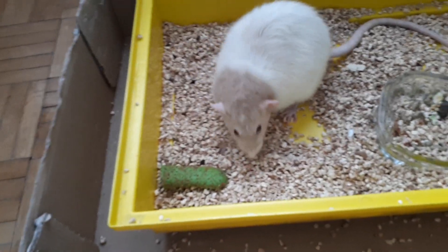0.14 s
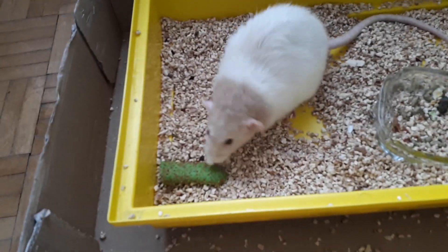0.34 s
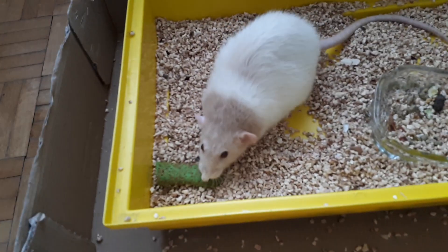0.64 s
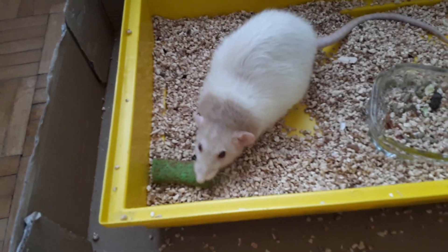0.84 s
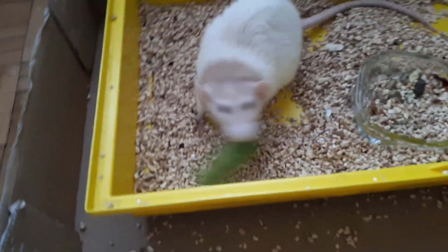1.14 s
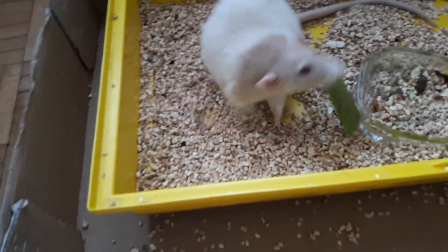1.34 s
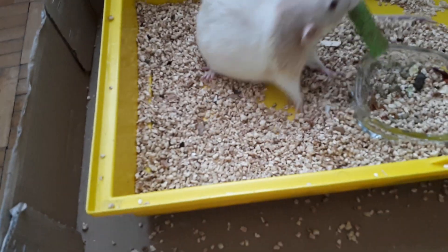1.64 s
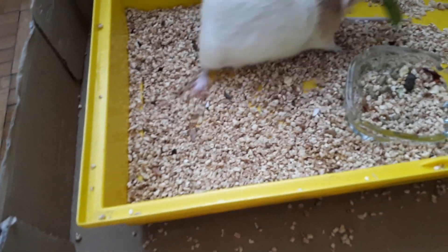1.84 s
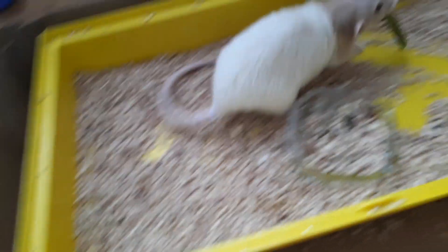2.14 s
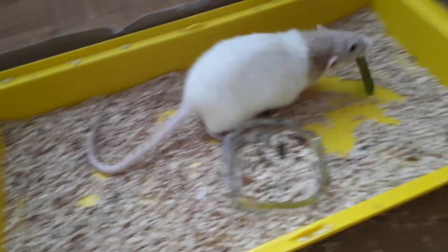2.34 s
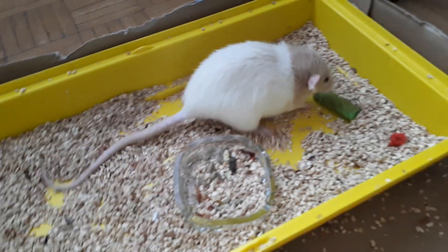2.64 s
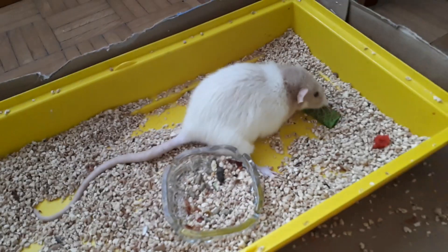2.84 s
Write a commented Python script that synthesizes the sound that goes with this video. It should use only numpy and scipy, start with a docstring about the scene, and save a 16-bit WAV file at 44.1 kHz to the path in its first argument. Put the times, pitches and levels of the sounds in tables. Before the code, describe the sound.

A pet rat rustles and crunches through dry granular bedding, faint ticks first, then louder scuffles

```python
"""First small dry ticks over a faint rustle; then louder shuffles, crunches, bumps, a knock and a clink.
A pet rat noses through loose granular bedding in a plastic tray: random grain clicks, filtered, under envelopes.
Teeth or claws tick as short decaying cosines; footfalls bump the tray floor and ring its damped modes.
A stick treat knocks on the tray wall and clinks on a glass bowl, both as struck modes.
The tray stands in a cardboard box in a quiet room: decaying noise echoes and faint shaped noise."""
import sys
import numpy as np
from scipy import signal
from scipy.fft import rfft, irfft
from scipy.io import wavfile

SR = 44100
rng = np.random.default_rng(int(sys.argv[2]) if len(sys.argv) > 2 else 0)


def int16_out(signal):
    """Quantize to a 16-bit WAV file."""
    q = np.round(np.clip(np.atleast_2d(signal).T, -1, 1) * 32767)
    wavfile.write(sys.argv[1], SR, q.astype(np.int16))


N = 132300  # 3 s
HZ = np.fft.rfftfreq(4096, 1 / SR)  # filter frequencies
T = np.arange(SR // 4) / SR  # time axis of one event [s]

# Shuffles through the bedding: (start [s], length [s], level [dB], treble [dB])
SHUFFLE_EVENTS = [(0, 0.11, -49, -3), (0.139, 0.038, -44.5, -4.5), (0.258, 0.083, -35.5, -6.5),
                  (0.343, 0.1, -55, 6), (0.47, 0.095, -52, -2), (.577, 0.06, -49, -6),
                  (0.702, 0.034, -41, -14), (0.776, 0.037, -46.5, -11), (0.858, 0.038, -44.5, -10),
                  (1.01, 0.12, -52, -2), (1.118, 0.049, -37.5, -6.5), (1.152, 0.067, -35.5, -2.5),
                  (1.259, 0.094, -41, -6), (1.338, 0.039, -29.5, -2), (1.384, 0.12, -35.5, -3),
                  (1.53, 0.047, -31.5, 0), (1.613, 0.13, -32.5, -1), (1.744, 0.18, -32, -1),
                  (1.939, 0.11, -32.5, 1.5), (2.051, 0.072, -34.5, -1.5), (2.134, 0.036, -25, 1.5),
                  (2.186, 0.09, -40, -6), (2.257, 0.053, -33, -1), (2.318, 0.16, -40, -3),
                  (2.47, 0.087, -32.5, 0), (2.564, 0.052, -26, -1), (2.617, .12, -31.5, -2),
                  (2.746, 0.135, -30, 1), (2.89, 0.038, -37.5, -8), (2.967, 0.025, -39, -3)]
SHUFFLE_RISE_S, SHUFFLE_LEAD_S, SHUFFLE_FALL_S = 0.022, 0.012, 0.013
LUMP_RANGE_DB, LUMP_STEP_S = 3, 0.00697  # uneven push
GRAINS_PER_S, GRAIN_SPREAD_DB = 6000, 2.5
# Larger single pellets snap past each other; decay time counted in cycles
PELLETS_PER_S, PELLET_DB, PELLET_DECAY_CYCLES = 330, -8.5, 3.5
PELLET_LOW_HZ, PELLET_HIGH_HZ, PELLET_SIZES = 1413, 12270, 10

# Grains give way under a paw: (time [s], level [dB], decay [s], treble [dB])
CRUNCH_EVENTS = [(0.255, -30.5, 0.0019, -6), (0.268, -28, 0.0012, -9), (.328, -28, 0.0017, -8),
                 (.720, -33, 0.0036, -6), (.784, -34, 0.0019, -9), (.862, -37.5, 0.0027, -10),
                 (.882, -33.5, 0.0018, -9), (1.167, -19.5, 0.0065, -4), (1.424, -18.5, 0.0062, 0.5),
                 (1.433, -19, 0.004, 2.5), (1.536, -23, 0.0089, -5), (1.731, -19, 0.0092, -7.5),
                 (1.754, -20.5, 0.0039, -12), (1.7824, -18.5, 0.0058, -4.5), (1.872, -14, 0.0024, -26),
                 (1.933, -22, 0.0046, 4.5), (1.954, -21, 0.0076, 2.5), (1.9944, -19, 0.0021, 6.5),
                 (2.142, -20.5, 0.0045, 10), (2.176, -19, 0.0034, 7.5), (2.3863, -18.5, 0.004, 7),
                 (2.406, -28, .004, -1), (2.576, -21.5, 0.0067, 0), (2.7136, -12, 0.0045, -6.5),
                 (2.8654, -10.5, 0.0035, 3.5), (2.968, -25.5, 0.0039, -1)]
CRUNCH_RISE_S, CRUNCH_LEAD_S = 0.0019, 0.001
CRUNCH_GRAINS_PER_S, CRUNCH_SPREAD_DB = 14000, 2.5

# Grain spectrum: (frequency [Hz], gain [dB])
GRAIN_SPECTRUM = [(100, -34), (270, -24.5), (370, -12.5), (550, -16.5), (780, 1), (1100, -2), (16000, -2)]
TREBLE_FROM_HZ, TREBLE_FULL_HZ = 4700, 11100

# Ticks of teeth or claws: (time [s], level [dB], pitch [Hz], decay [s], lower resonance [dB])
TICK_EVENTS = [(.0068, -24.5, 3380, 0.00031, -8), (0.0445, -21, 3260, 0.00033, -22),
               (.210, -32.5, 3640, 0.00077, -24), (0.2201, -32, 3680, 0.0007, -24),
               (0.3757, -25, 3740, .00073, -22), (.3879, -22.5, 3680, .00044, -9),
               (0.4386, -18, 4450, .00015, -12)]
TICK_SNAP_GAIN, TICK_LOW_HZ, TICK_LOW_DECAY_S, CRUMBS_DB = 0.92, 2650, 0.00044, -14

# Bumps on the tray floor, some with less bass:
# (time [s], level [dB], low edge [Hz], high edge [Hz], decay [s])
BUMP_EVENTS = [(1.244, -28.5, 600, 1800, 0.022), (1.257, -26, 565, 1020, 0.016),
               (1.424, -36.5, 300, 1370, 0.022), (1.483, -35.5, 310, 567, 0.013),
               (1.733, -40, 250, 1380, 0.057), (1.783, -36.5, 150, 1300, 0.056),
               (2.147, -36, 450, 1400, 0.041), (2.175, -30, 400, 1120, .01),
               (2.405, -30.5, 750, 1600, 0.0081), (2.456, -37, 800, 1010, 0.0056),
               (2.711, -18, 330, 1800, 0.016), (2.725, -26, 304, 910, 0.023),
               (2.772, -35.5, 140, 1160, 0.041), (2.865, -41.5, 100, 486, 0.031)]
# Plastic tray modes: (frequency [Hz], level [dB], t60 [s])
TRAY_MODES = [(367.7, -2.5, 0.11), (620.4, -5.5, 0.1), (883, -6.5, 0.059), (986, -4.5, 0.055),
              (1420, -2, 0.061)]
TRAY_RING_DB, TRAY_DETUNE = 2, 0.02
# Dull tray thud spectrum: (frequency [Hz], gain [dB])
THUD_SPECTRUM = [(25, -35), (160, -10.5), (250, -17.5), (360, -1), (520, -4), (800, 1.5), (3000, 0.5),
                 (16000, -33)]

# Hard stick treat, struck modes: (frequency [Hz], level [dB], t60 [s])
TREAT_MODES = [(1760, -0.5, 0.065), (1932, -0.5, .07), (2030, -2, .09), (2437, -10.5, 0.056),
               (2770, 0, 0.035), (3033, -3.5, 0.046), (3400, -1.5, 0.043), (4241, -0.5, 0.037),
               (6590, 0, 0.027)]
KNOCK_S, KNOCK_DB = 1.2428, -21.5
CRACK_DB, CRACK_TREBLE_DB = -9.5, -2.0
CRACK_DECAY_S = 0.0039  # also crumbs and chatter
CHATTER_DB = -3.5  # rough stick skids after each contact
TREAT_LOW_HZ = 500  # the knock and the clinks carry no bass below this
# Treat touches the glass bowl: (time [s], level [dB])
CLINK_EVENTS = [(1.424, -27.5), (1.556, -44)]
# Glass bowl modes: (frequency [Hz], level [dB], t60 [s])
GLASS_MODES = [(3737, -4.5, 0.055), (5230, 2, 0.055), (7950, -5, .08), (12890, -10, .07), (13930, -2, .06)]

# Echoes in the box and the room; above APART_HZ the two sides diverge
BOX_DB, BOX_T60_S = -15, 0.048
ROOM_DB, ROOM_T60_S = -11.5, 0.34
APART_HZ, ECHO_DELAY_S = 1430, 0.001

# Quiet room spectrum: (frequency [Hz], relative density [dB])
AMBIENCE_SPECTRUM = [(45, -13), (85, 2), (300, -11.5), (800, -17), (2000, -7.5), (16000, -9.5)]
AMBIENCE_DB, AMBIENCE_SIDE_GAIN = -61, 0.81

# Shaded left port: sound shared with the right, and grains and bumps drawn for the left alone:
# (frequency [Hz], shared gain [dB], own gain [dB])
LEFT_SHADE = [(402, -4, -12), (1020, -1.5, -5.5), (3000, -3, -0.5), (16000, -11.5, -3.5)]
# Resonant right port faces the tray, left is shaded: (frequency [Hz], left gain [dB], right gain [dB])
PORT_SPECTRA = [(298, 0, -1), (975, -2.5, -1), (1340, -8, -1.5), (1830, -3, 5), (2070, -11, 2.5),
                (2620, -9, 6.5), (3290, -14.5, 10.5), (3820, -13.5, 13.5), (4800, -15, 5), (6270, -12, 5),
                (7310, -11.5, -10), (8580, -11.5, -19), (9730, -18.5, -8.5), (12200, -13, 2),
                (14170, -13, -7.5), (16000, -15, -25)]
OVERLOAD, EDGE_HZ = 0.98, 16100


def amp(db):
    """Decibels to gain."""
    return 10 ** (np.asarray(db) / 20)


def unit(x):
    """Scales to rms 1."""
    return x / np.sqrt(np.mean(x ** 2) + 1e-20)


def read(points, hz, axis=1):
    """Interpolates one column of a spectrum table over log frequency."""
    table = np.transpose(points)
    return np.interp(np.log(hz + 1), np.log(table[0] + 1), table[axis])


def add(mix, start_s, sound):
    """Mixes a sound in, no earlier than time 0 and cut at the end of the mix."""
    part = mix[max(round(start_s * SR), 0):][:len(sound)]
    part += sound[:len(part)]


def colour(x, gain_db):
    """Causal minimum-phase filter, via the folded cepstrum, with gain_db at the frequencies HZ."""
    cepstrum = irfft(np.log(amp(gain_db)))
    cepstrum[1:len(HZ) - 1] *= 2
    cepstrum[len(HZ):] = 0
    impulse = irfft(np.exp(rfft(cepstrum)))[:len(HZ)]
    return signal.fftconvolve(x, impulse)[:len(x)]


def bedding():
    """Grains rub during each shuffle and collapse in short crunches."""
    out = np.zeros(N)
    for start_s, length_s, db, treble_db in SHUFFLE_EVENTS:
        rustle = colour(shuffle(length_s), grain_colour(treble_db))
        add(out, start_s - SHUFFLE_LEAD_S, amp(db) * rustle)
    for time_s, db, decay_s, treble_db in CRUNCH_EVENTS:
        crunch = burst(decay_s) * grains(CRUNCH_GRAINS_PER_S, CRUNCH_SPREAD_DB)
        add(out, time_s - CRUNCH_LEAD_S, amp(db) * colour(crunch, grain_colour(treble_db)))
    return out


def shuffle(length_s):
    """An uneven push swells and fades, rubbing fine grains and flicking a few pellets."""
    rise = np.minimum(T / SHUFFLE_RISE_S, 1) ** 2
    fall = np.exp(-np.maximum(T - SHUFFLE_LEAD_S - length_s, 0) / SHUFFLE_FALL_S)
    lumps = np.interp(T / LUMP_STEP_S, np.arange(len(T)), rng.uniform(-1, 1, len(T)))
    rub = unit(amp(LUMP_RANGE_DB * lumps)) * grains(GRAINS_PER_S, GRAIN_SPREAD_DB)
    return rise * fall * unit(rub + amp(PELLET_DB) * pellets())


def pellets():
    """Sparse snaps of pellets of many sizes excite short resonances."""
    out = np.zeros(len(T))
    for hz in np.geomspace(PELLET_LOW_HZ, PELLET_HIGH_HZ, num=PELLET_SIZES):
        chance, size = rng.random((2, len(T)))
        hit = chance < PELLETS_PER_S / PELLET_SIZES / SR
        snaps = hit * (0.5 + size ** 2) * hz
        pole = np.exp((2j * np.pi - 1 / PELLET_DECAY_CYCLES) * hz / SR)
        out += signal.lfilter([1], [1, -pole], snaps + 1e-9).imag
    return unit(out)


def grains(per_s, spread_db):
    """Random clicks of rms 1 and either sign, many small and a few large."""
    chance, size, sign = rng.random((3, len(T)))
    size = np.minimum(-np.log(1 - size), 5)  # capped exponential
    return unit((chance < per_s / SR) * np.sign(sign - 0.5) * amp(spread_db * size))


def grain_colour(treble_db):
    """Grain spectrum with a treble shelf, in dB."""
    shelf = [(TREBLE_FROM_HZ, 0), (TREBLE_FULL_HZ, treble_db)]
    return read(GRAIN_SPECTRUM, HZ) + read(shelf, HZ)


def burst(decay_s):
    """Force envelope: quick rise, exponential decay."""
    rise = np.minimum(T / CRUNCH_RISE_S, 1) ** 2
    return rise * np.exp(-np.maximum(T - CRUNCH_RISE_S, 0) / decay_s)


def ticks():
    """Each tick is a snap, a few cycles of two resonances, and crumbs breaking away."""
    out = np.zeros(N)
    for time_s, db, hz, decay_s, low_db in TICK_EVENTS:
        tick = np.exp(-T / decay_s) * np.cos(2 * np.pi * hz * T)
        low = np.exp(-T / TICK_LOW_DECAY_S) * np.cos(2 * np.pi * TICK_LOW_HZ * T)
        tick += amp(low_db) * low
        tick[0] *= 0.5  # softer onset
        tick[:2] += TICK_SNAP_GAIN * np.array([0.5, -0.5])
        clicks = colour(grains(GRAINS_PER_S, GRAIN_SPREAD_DB), read(GRAIN_SPECTRUM, HZ))
        crumbs = np.exp(-T / CRACK_DECAY_S) * clicks
        add(out, time_s, amp(db) * (tick + amp(CRUMBS_DB) * crumbs))
    return out


def tray():
    """Weight lands on the plastic floor: a thud and a damped ring, its pitches slightly different each time."""
    out = np.zeros(N)
    for time_s, db, low_hz, high_hz, decay_s in BUMP_EVENTS:
        shifts = 1 + TRAY_DETUNE * rng.uniform(-0.86, 1, len(TRAY_MODES))  # random per bump
        shifted = [(hz * shift, mode_db, t60_s) for (hz, mode_db, t60_s), shift in zip(TRAY_MODES, shifts)]
        modes = ring(shifted)
        high_loss = 1 + (HZ / high_hz) ** 4
        low_loss = 1 + (low_hz / (HZ + 60)) ** 4
        shape_db = read(THUD_SPECTRUM, HZ) - 10 * np.log10(high_loss * low_loss)
        force = burst(decay_s) * grains(CRUNCH_GRAINS_PER_S, CRUNCH_SPREAD_DB)
        blow = colour(force, shape_db) / np.sqrt(np.mean(amp(shape_db) ** 2))
        rung = signal.fftconvolve(blow, modes / abs(rfft(modes)).max())[:len(T)]
        add(out, time_s - CRUNCH_LEAD_S, amp(db) * (blow + amp(TRAY_RING_DB) * rung))
    return out


def treat():
    """The stick cracks against the tray wall, then sets the glass bowl ringing."""
    out = np.zeros(N)
    clicks = colour(grains(CRUNCH_GRAINS_PER_S, CRUNCH_SPREAD_DB), grain_colour(CRACK_TREBLE_DB))
    crack = np.exp(-T / CRACK_DECAY_S) * clicks
    add(out, KNOCK_S, amp(KNOCK_DB) * strike(TREAT_MODES) + amp(CRACK_DB) * crack)
    for time_s, db in CLINK_EVENTS:
        add(out, time_s, amp(db) * strike(GLASS_MODES))
    return signal.lfilter(*signal.butter(3, TREAT_LOW_HZ, "high", fs=SR), out)


def strike(modes):
    """One firm contact and a chatter of small ones set the modes ringing."""
    chatter = np.exp(-T / CRACK_DECAY_S) * grains(GRAINS_PER_S, GRAIN_SPREAD_DB)
    force = amp(CHATTER_DB) * chatter / np.linalg.norm(chatter)
    force[0] += 1
    return signal.fftconvolve(force, ring(modes))[:len(T)]


def ring(modes):
    """Dying sines of a struck object, alternating in sign."""
    out = np.zeros(len(T))
    for k, (hz, db, t60_s) in enumerate(modes):
        out += (-1) ** k * amp(db - 60 * T / t60_s) * np.sin(2 * np.pi * hz * T)
    return out


def echoes(x, t60_s):
    """A dying noise tail of reflections, alike at both ports in the bass and diverging in the treble."""
    decay = amp(-60 * T / t60_s) * (T > ECHO_DELAY_S)
    shared, apart = rng.standard_normal((2, len(T))) * decay
    side = signal.lfilter(*signal.butter(1, APART_HZ, "high", fs=SR), apart)
    tail = np.array([shared + side, shared - side])
    return signal.fftconvolve(x[None], tail / np.linalg.norm(tail[0]), axes=1)[:, :N]


def ambience():
    """Faint room rumble and hiss: shaped noise with independent mid and side."""
    spectrum_db = read(AMBIENCE_SPECTRUM, HZ)
    mid, side = (unit(colour(noise, spectrum_db)) for noise in rng.standard_normal((2, N)))
    side = AMBIENCE_SIDE_GAIN * side
    return amp(AMBIENCE_DB) * np.array([mid + side, mid - side])


def scene():
    """All sounds in the tray, heard directly and thrown back by the box and the room."""
    dry = bedding() + ticks() + tray() + treat()
    box = amp(BOX_DB) * echoes(dry, BOX_T60_S)
    room = amp(ROOM_DB) * echoes(dry, ROOM_T60_S)
    shared = colour(dry, read(LEFT_SHADE, HZ, axis=1))
    own = colour(bedding() + tray(), read(LEFT_SHADE, HZ, axis=2))  # fresh random draws
    return np.array([shared + own, dry]) + box + room + ambience()


def record(dry):
    """Colours the two microphone ports, clips at overload, then limits the band."""
    left = colour(dry[0], read(PORT_SPECTRA, HZ, axis=1))
    right = colour(dry[1], read(PORT_SPECTRA, HZ, axis=2))
    heard = np.clip(np.array([left, right]), -OVERLOAD, OVERLOAD)
    lowpass = signal.firwin(255, EDGE_HZ, window=("kaiser", 9), fs=SR)
    return signal.oaconvolve(heard, lowpass[None], "same")


dry = scene()
out = record(dry)
int16_out(out)
```